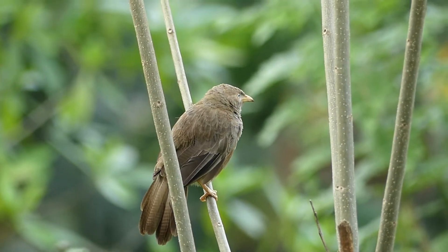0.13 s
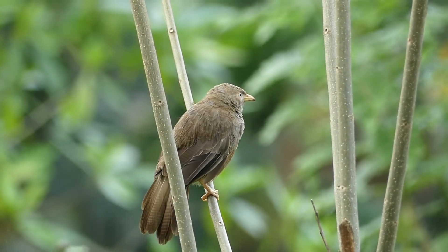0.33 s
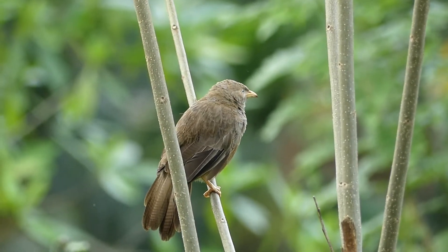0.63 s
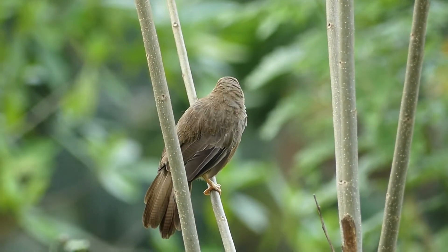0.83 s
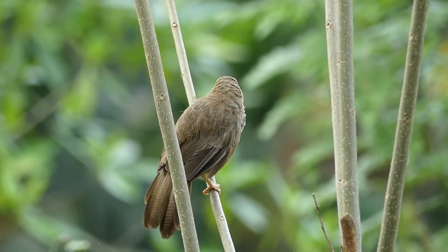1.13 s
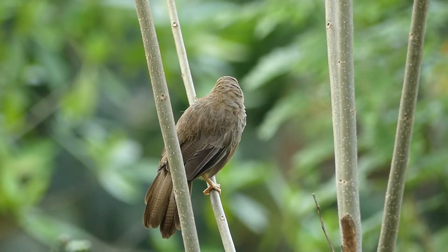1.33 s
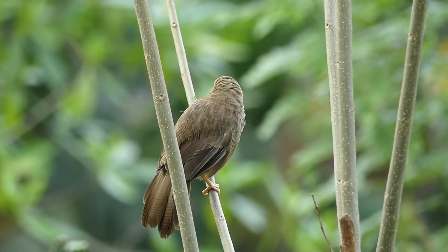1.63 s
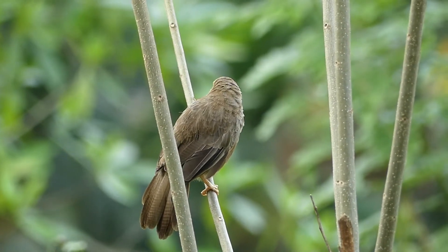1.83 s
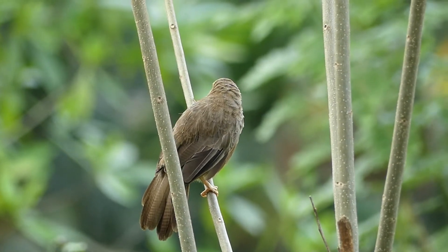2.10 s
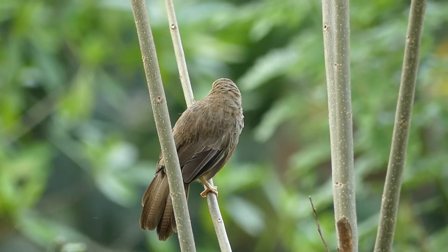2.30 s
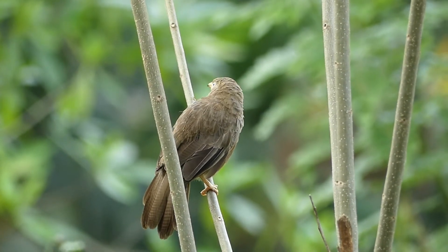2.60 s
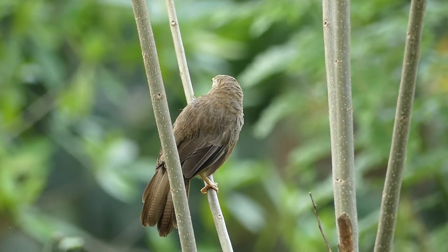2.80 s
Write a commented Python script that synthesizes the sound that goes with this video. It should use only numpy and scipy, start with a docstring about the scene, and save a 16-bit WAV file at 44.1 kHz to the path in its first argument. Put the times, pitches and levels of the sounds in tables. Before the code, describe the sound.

Birdsong echoes lightly among trees, opening with a raspy falling call near the microphone. A distant quivering whistle follows, joined by quick pips and ending in soft upward chirps, over a thin insect buzz, leaf hiss and a faint rush.

```python
"""Forest birds and insects

A near bird gives a harsh falling call, a far one whistles a long wavering phrase; others add
pips, slurs and upward chirps. Each voice is a near sine on a moving pitch, scattered into a tail
by the trees. Insects buzz steadily in two high bands over a distant low rush and leaf hiss."""
import sys
import numpy as np
from scipy import signal
from scipy.fft import rfft, irfft
from scipy.io import wavfile
from scipy.ndimage import uniform_filter1d

SR = 44100
rng = np.random.default_rng(int(sys.argv[2]) if len(sys.argv) > 2 else 0)


def dump_mix(stems):
    """Bounce the given channels to the path in sys.argv[1] as a 16-bit WAV at rate SR."""
    frames = np.atleast_2d(stems).T  # one column per channel
    limited = np.clip(frames, -1, 1)  # hard clip at full scale
    pcm = np.round(limited * 32767).astype(np.int16)
    wavfile.write(sys.argv[1], SR, pcm)


N = 130095
TIME_S = np.arange(N) / SR
SIDE = np.array([[1], [-1]])  # left/right polarity


def undb(db):
    """Decibels to gain."""
    return 10 ** (np.asarray(db) / 20)


def unit(x):
    """Scale to rms 1."""
    return x / np.sqrt(np.mean(x ** 2))


def walk(rate_hz):
    """Smooth random wander, rms 1."""
    span = max(int(SR / rate_hz), 1)
    return unit(uniform_filter1d(uniform_filter1d(rng.standard_normal(N), span), span))


def coloured(spectrum):
    """Noise of rms 1, shaped by (frequency [Hz], density [dB]) points."""
    hz, db = np.array(spectrum).T
    bins_hz = np.maximum(np.fft.rfftfreq(N, 1 / SR), 1)
    shape = undb(np.interp(np.log(bins_hz), np.log(hz), db))
    return unit(irfft(rfft(rng.standard_normal(N)) * shape, N))


def syrinx(hz, overtones_db=()):
    """Bird voice: a sine on a moving pitch, optional harmonics from the 2nd up."""
    phase = 2 * np.pi * np.cumsum(hz) / SR
    overtones = sum(undb(db) * np.sin(k * phase) for k, db in enumerate(overtones_db, 2))
    return np.sqrt(2) * (np.sin(phase) + overtones)


def gesture(curve, edge_s=.0026):
    """Pitch and soft-edged gain of a call from (time [s], pitch [Hz], level [dB]) points."""
    times_s, hz, db = np.array(curve).T[:3]
    gate = np.clip(np.minimum(TIME_S - times_s[0], times_s[-1] - TIME_S) / edge_s + .5, 0, 1)
    pitch_hz = uniform_filter1d(np.interp(TIME_S, times_s, hz), int(edge_s * SR))
    return pitch_hz, gate * undb(np.interp(TIME_S, times_s, db))


def note(start_s, length_s, first_hz, mid_hz, last_hz, db, overtones_db=(), waver=.0029):
    """Short note: pitch arcs through three values, level fades over the outer quarters."""
    progress = np.clip((TIME_S - start_s) / length_s, 0, 1)
    hz = np.polyval(np.polyfit([0, .5, 1], [first_hz, mid_hz, last_hz], 2), progress)
    ramp = np.clip(np.minimum(progress, 1 - progress) / .25, 0, 1)
    swell = np.sin(np.pi / 2 * ramp) ** 2
    return undb(db) * swell * syrinx(hz * (1 + waver * walk(373)), overtones_db)


def background():
    """Slowly swelling distant rush, thin hiss of leaves and far wildlife."""
    # rush swell (time [s], level [dB])
    rush_swell = [(0, -36), (1.45, -35), (2.95, -36.5)]
    # rush spectrum (frequency [Hz], relative density [dB])
    rush_spectrum = [(25, -52), (55, -57), (100, -41.5), (200, -29.5), (270, -21), (340, -10.5), (450, -4),
                     (540, -9), (660, -11), (800, -3), (1000, 0), (1200, 2), (1320, -2), (1430, -13.5),
                     (1560, -22), (1900, -23), (4000, -64)]
    # hiss spectrum (frequency [Hz], relative density [dB])
    hiss_spectrum = [(30, -56), (300, -8), (1600, -0.5), (2000, 5), (2300, 1), (2700, 5.5), (3200, 3),
                     (3800, 3.5), (4500, -2.5), (5100, -10.5), (6200, -7), (7400, -35), (8100, -21.5),
                     (9000, -5.5), (11200, -13.5), (13500, -13), (15500, -18.5)]
    # stereo side noise, peaking in the insect bands (frequency [Hz], relative density [dB])
    side_spectrum = [(20, -36), (80, -33), (200, -7), (420, 3.5), (1300, 0.5), (2200, -4), (4500, -7),
                     (5000, -20), (6780, -5), (6920, 5.5), (7250, -1), (7500, -19), (8500, -11),
                     (9500, 2.5), (10300, 1), (11100, -25), (13500, -23), (15500, -26)]
    rush = undb(np.interp(TIME_S, *np.array(rush_swell).T)) * coloured(rush_spectrum)
    hiss = undb(-47 + .5 * walk(15)) * coloured(hiss_spectrum)
    side = undb(-55.5 + .69 * walk(20)) * coloured(side_spectrum)
    return rush + hiss + side * SIDE


def insects():
    """Buzzing chorus: narrow resonant noise bands that throb fast and unevenly."""
    # bands (centre [Hz], spread [Hz], level [dB], pulse rate [Hz], pulse depth [0-1])
    bands = [(6937, 194, -48, 53, 0.062), (6600, 200, -56, 56, 0.26), (9760, 220, -56.5, 220, 0.061),
             (10390, 150, -59.5, 220, 0.07)]
    bins_hz, chorus = np.fft.rfftfreq(N, 1 / SR), 0
    for centre_hz, spread_hz, db, pulse_hz, depth in bands:
        resonance = (1 + ((bins_hz - centre_hz) / spread_hz / 2) ** 2) ** -2
        band = irfft(rfft(rng.standard_normal(N)) * resonance, N)
        throb = 1 + depth * uneven_sine(pulse_hz, drift=.118, drift_hz=43)
        chorus += undb(db + 2.24 * walk(39)) * unit(throb * band)
    return chorus


def uneven_sine(hz, drift, drift_hz):
    """Modulator whose rate wanders by the rms fraction `drift`."""
    return np.sin(2 * np.pi * np.cumsum(hz * (1 + drift * walk(drift_hz))) / SR)


def short_notes():
    """Near birds: slightly rough pips, sharp falling chips, one hoarse note."""
    # pips (start [s], length [s], first, mid, last pitch [Hz], level [dB], mean overtone level [dB])
    pip_notes = [(.007, 0.033, 3200, 2934, 3040, -32, -16), (0.946, 0.043, 2670, 2700, 2710, -40, -38),
                 (1.918, 0.045, 2720, 2763, 2630, -37.5, -29), (1.988, .022, 2880, 2900, 2840, -35.5, -22),
                 (2.025, 0.031, 2900, 2900, 2900, -38, -17), (2.055, 0.043, 3030, 3090, 3060, -37, -20.5),
                 (2.055, 0.046, 4500, 4590, 4700, -45, -26)]
    # chips (start [s], length [s], first, mid, last pitch [Hz], level [dB])
    chip_notes = [(0.212, 0.0078, 2443, 2160, 1800, -35.5), (1.9487, 0.00653, 2007, 1208, 1110, -26.5)]
    pips = sum(note(*row, overtones_db=(db + 1.5, db - 1.5), waver=.0124) for *row, db in pip_notes)
    chips = sum(note(*row) for row in chip_notes)
    hoarse = note(start_s=1.98, length_s=.02, first_hz=2516, mid_hz=2541, last_hz=2618,
                  db=-41.5, waver=.03)
    return pips + chips + hoarse


def strain(lag_s=0, peak_s=.13, width_s=.049):
    """How hard the harsh call is forced: one swell in its middle."""
    return np.exp(-.5 * ((TIME_S - peak_s - lag_s) / width_s) ** 2)


def harsh_call():
    """Falling whistle roughened by fast flutter of pitch and level; strain adds harmonics."""
    # call curve (time [s], pitch [Hz], level [dB], rasp [0-1])
    curve = [(.055, 3650, -37.5, 0.69), (.08, 3586, -30, 0.77), (.118, 3330, -26.5, 0.7),
             (.138, 3143, -24.5, 0.52), (.155, 2980, -31.5, 0.9), (0.171, 2830, -29.5, 1),
             (.179, 2644, -24, 0.44), (.191, 2624, -29.5, 0.44), (0.208, 2596, -31, 0.64)]
    hz, gain = gesture(curve)
    times_s, _, _, rasp_points = np.array(curve).T
    rasp = np.interp(TIME_S, times_s, rasp_points)
    flutter = uneven_sine(174.75, drift=.197, drift_hz=126)
    hz *= 1 + rasp * (.04 * flutter + .047 * walk(1200))
    gain *= 1 + rasp * (.65 * flutter + .3 * walk(270))
    strained = syrinx(hz, overtones_db=(-20, -34))
    return gain * (strain() * strained + (1 - strain()) * syrinx(hz))


def scratch():
    """Broad noise breaking out of the strained voice."""
    # scratch spectrum (frequency [Hz], relative density [dB])
    spectrum = [(30, -70), (300, -35), (1500, -8), (3000, 10), (5000, -5), (6500, 3), (8000, -11),
                (9300, 2), (11500, -27), (14000, -15), (15500, -26)]
    noise = coloured(spectrum) + .43 * coloured(spectrum) * SIDE
    return undb(-42) * strain(lag_s=.03) * noise


def slurs():
    """Soft gliding notes from deeper in the trees."""
    # slurs (start [s], length [s], first, mid, last pitch [Hz], level [dB])
    slur_notes = [(0.304, 0.069, 4930, 4970, 5080, -56), (0.357, 0.12, 4740, 4640, 4740, -54.5),
                  (0.803, 0.06, 1290, 1341, 1400, -37), (1.267, 0.062, 465, 455.5, 427, -42),
                  (1.352, 0.23, 3260, 3122, 2976, -46.5), (1.559, 0.11, 3000, 2890, 2800, -47.5),
                  (1.604, 0.058, 2720, 2670, 2550, -45), (1.585, 0.075, 1300, 1330, 1354, -40),
                  (2.19, 0.087, 3200, 3180, 2960, -44), (2.203, 0.044, 1440, 1485, 1470, -49),
                  (2.331, 0.081, 1310, 1326, 1280, -39), (2.422, 0.057, 4480, 4340, 4240, -54),
                  (2.488, 0.06, 3720, 3740, 3720, -50), (2.722, 0.12, 4600, 4504, 4370, -55),
                  (2.871, 0.075, 3200, 3410, 3460, -51.5)]
    return sum(note(*row, waver=.011) for row in slur_notes)


def whistler():
    """Far bird: slowly gliding whistles with a quick, uneven quiver."""
    # one curve per whistle (time [s], pitch [Hz], relative level [dB])
    curves = [
        [(.492, 3590, -44), (.53, 3780, -44), (.585, 3740, -58)],
        [(.762, 3360, -52), (.79, 3760, -37.5), (.835, 3850, -54)],
        [(.862, 3510, -39), (.895, 4183, -38.5), (.94, 4623, -42), (1.02, 4560, -49), (1.09, 4540, -45.5),
         (1.135, 4270, -39), (1.165, 3923, -36.5), (1.195, 3780, -35.5)],
        [(1.285, 4190, -39.5), (1.36, 3976, -37.5), (1.44, 4004, -41.5), (1.485, 4304, -36), (1.54, 4376, -34),
         (1.63, 4362, -58), (1.70, 4076, -35), (1.745, 3752, -35.5), (1.79, 3740, -42)],
        [(1.86, 3860, -42), (1.905, 4017, -27), (1.925, 4006, -44), (1.948, 3900, -32), (1.99, 3870, -40)],
        [(2.06, 3930, -36), (2.095, 3924, -34), (2.122, 3923, -32.5), (2.16, 3874, -57)],
    ]
    quiver = uneven_sine(75, drift=.3, drift_hz=52)
    bend = 1 + .011 * quiver + .00796 * walk(190)
    return sum(gain * syrinx(hz * bend) for hz, gain in map(gesture, curves))


def chirps():
    """One bird's chirps: each lingers low, then swells and sweeps up ever faster."""
    # chirps (start [s], length [s], low pitch [Hz], high pitch [Hz], peak level [dB])
    sweeps = [(2.125, 0.065, 2470, 2860, -49), (2.342, .086, 2476, 3030, -46),
              (2.589, 0.059, 2620, 3220, -40), (2.798, .074, 2610, 3170, -41)]
    progress, song = np.linspace(0, 1, 20), 0
    swell_db = np.interp(progress, [0, .67, 1], [-10, 0, -4.5])
    for start_s, length_s, low_hz, high_hz, db in sweeps:
        rise_hz = low_hz + (high_hz - low_hz) * progress ** 2.2
        hz, gain = gesture(np.c_[start_s + length_s * progress, rise_hz, db + swell_db])
        song += gain * syrinx(hz)
    return song


def forest(x, early_db, early_t60_s, build_s, width, tail_t60_s=.93, first_echo_s=.0034):
    """Scatter from trunks and leaves: an early cluster that builds up, and a long tail."""
    t = TIME_S[:N // 2]
    decay = undb(-60 * t / tail_t60_s) + undb(early_db - 60 * t / early_t60_s)
    envelope = decay * np.clip((t - first_echo_s) / build_s, 0, 1)
    envelope /= np.linalg.norm(envelope)
    mid, side = (signal.fftconvolve(x, rng.standard_normal(len(t)) * envelope)[:N] for _ in range(2))
    return mid + width * side * SIDE


def trunks(x):
    """Distinct echoes from the two nearest trunks."""
    # echoes (delay [s], gain [dB])
    echoes = [(.031, -14), (.068, -19.5)]
    return sum(undb(db) * np.interp(TIME_S - delay_s, TIME_S, x, left=0) for delay_s, db in echoes)


def scene():
    """All birds, direct and through the trees, over insects and background."""
    notes, harsh, slurred, whistles, rising = short_notes(), harsh_call(), slurs(), whistler(), chirps()
    direct = notes + harsh + scratch() + slurred + undb(-3.5) * whistles + rising
    near_send = undb(-5) * notes + undb(-7.5) * harsh
    far_send = undb(-.5) * slurred + undb(-1) * whistles + undb(-4) * rising
    near_tail = forest(near_send, early_db=4.5, early_t60_s=.18, build_s=.0034, width=.12)
    far_tail = forest(far_send, early_db=-4.5, early_t60_s=.77, build_s=.011, width=.027)
    return background() + insects() + direct + trunks(notes + harsh) + near_tail + far_tail


def record(dry, low_hz=30, top_hz=15350):
    """Thin the deepest bass, cut the top steeply."""
    highpass = signal.butter(2, low_hz, "high", fs=SR, output="sos")
    lowpass = signal.ellip(10, .2, 80, top_hz, fs=SR, output="sos")
    return signal.sosfilt(lowpass, signal.sosfilt(highpass, dry))


dry = scene()
out = record(dry)
dump_mix(out)
```